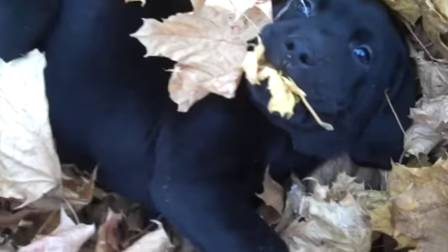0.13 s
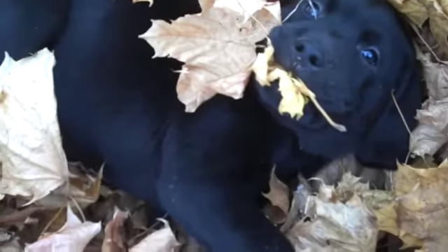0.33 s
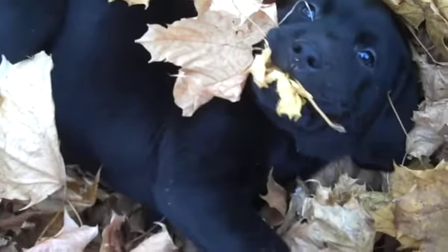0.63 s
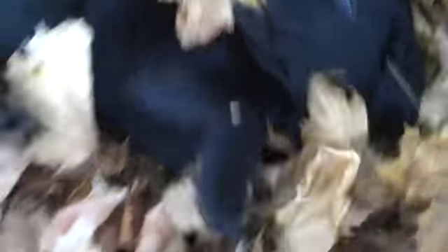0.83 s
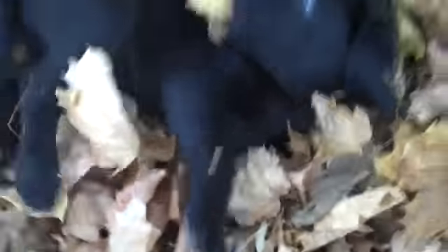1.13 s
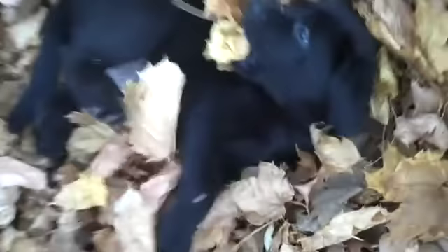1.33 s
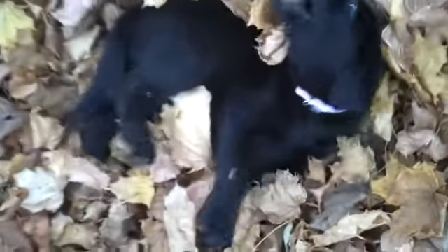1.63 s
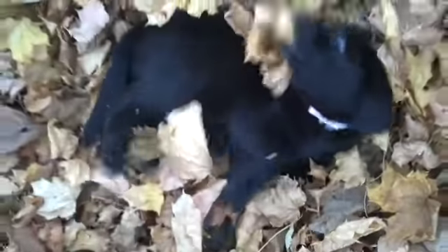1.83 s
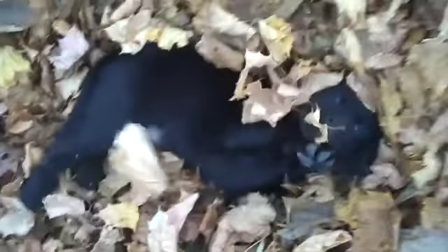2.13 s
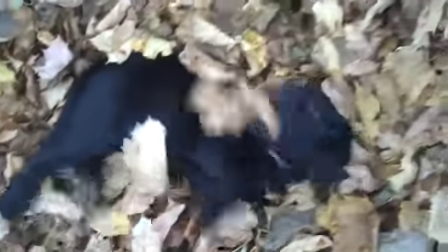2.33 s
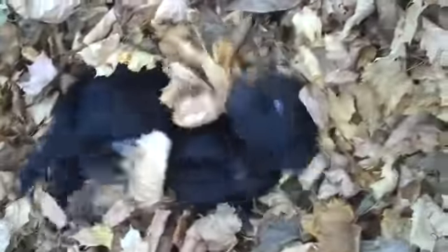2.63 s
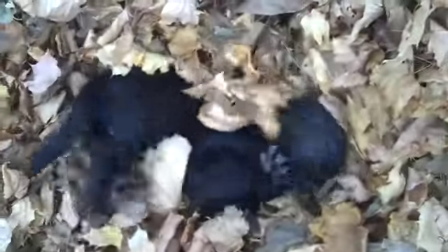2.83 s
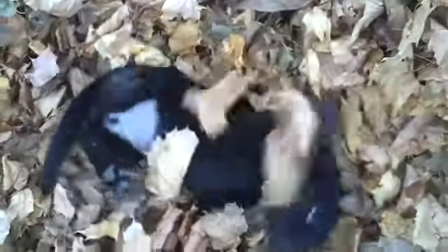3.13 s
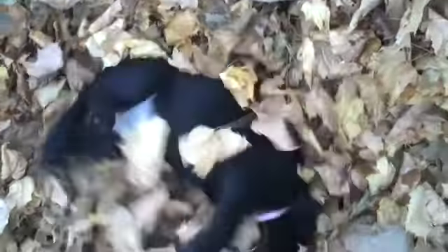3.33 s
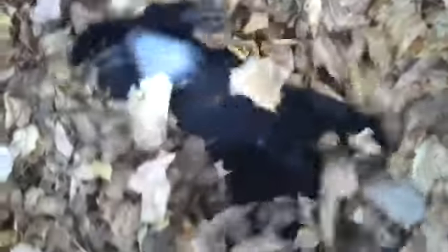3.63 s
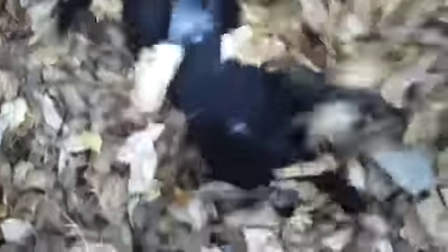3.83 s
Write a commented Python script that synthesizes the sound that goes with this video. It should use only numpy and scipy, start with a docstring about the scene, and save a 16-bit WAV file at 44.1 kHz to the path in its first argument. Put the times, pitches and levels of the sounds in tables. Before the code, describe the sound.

Dry leaves, close and crisp outdoors. After a brief silence, a soft low bump and sparse little clicks until 0.6 s, as a puppy chews a leaf. At 0.67 s a sudden crackling burst, then continuous rustling in waves, with sharp stem snaps around 0.9, 1.0 and 3.1 s. It dips near 2.2 s, peaks with heavier crunching at 3.25 s and stays busy to the end. Faint air and fading hum lie behind.

```python
"""Dry leaves rustle in a pile, close to a hand-held microphone, as a puppy chews one, squirms and rolls over.
Thousands of tiny random fractures ring briefly and merge into a rustle that swells with each movement;
the puppy's weight adds a duller crunch and a rattle of whole leaves. Stems and leaf ribs snap as short
runs of clicks. The microphone preamp's level jumps now and then and sinks back, a low electrical bump.
Behind them lie faint outdoor air and a fading low hum, both made of filtered noise."""
import sys
import numpy as np
from scipy import signal
from scipy.fft import rfft, irfft
from scipy.io import wavfile

SR = 44100
rng = np.random.default_rng(int(sys.argv[2]) if len(sys.argv) > 2 else 0)


def wav_record(signal):
    """Record a signal, one row per channel, as 16-bit PCM in the file named by sys.argv[1]."""
    frames = np.transpose(np.atleast_2d(signal))
    bounded = np.clip(frames, -1, 1)
    # unit amplitude maps onto the largest positive 16-bit level
    quanta = np.round(bounded * 32767).astype(np.int16)
    wavfile.write(sys.argv[1], SR, quanta)


N = 176400  # samples, 4 s


def amp(db):
    """Decibels to gain."""
    return 10 ** (np.asarray(db) / 20)


def unit(x):
    """Scales to rms 1."""
    return x / np.sqrt(np.mean(x ** 2) + 1e-20)


def add(mix, s, sound):
    """Mixes a sound in at a time in seconds, cut off at the end of the mix."""
    part = mix[max(round(s * SR), 0):][:len(sound)]
    part += sound[:len(part)]


def colour(x, spectrum):
    """Filters by gains given as points, joined along log frequency."""
    hz, db = np.transpose(spectrum)
    f = np.fft.rfftfreq(len(x), 1 / SR)
    gain = amp(np.interp(np.log(f + 1), np.log(hz), db))
    return irfft(rfft(x) * gain, len(x))


def wander(step_s):
    """A random curve with a new target every step and straight lines between."""
    knots = rng.standard_normal(4096)
    return np.interp(np.arange(N) / SR / step_s, np.arange(len(knots)), knots)


def ring(hz, cycles):
    """A piece of dry leaf rings as a sine that decays by 1/e in the given number of cycles."""
    turns = hz * np.arange(512) / SR
    return np.sin(2 * np.pi * turns) * np.exp(-turns / cycles)


LEAF_S, LEAF_DB = 0.04, 2.5  # each leaf is pressed and let go: step in s, swing in dB


def fractures(per_s, spread_db, cycles, low_hz, high_hz, count=32):
    """Random tiny breaks of uneven size in many leaves, each leaf with its own pitch."""
    out = np.zeros(N)
    chance = per_s / SR / count  # per sample and leaf
    for hz in np.linspace(low_hz, high_hz, count):
        draw, size = rng.random((2, N))
        at = np.flatnonzero(draw < chance)
        sign = np.where(at % 2, 1, -1)
        excess = np.minimum(-np.log(1 - size[at]), 3)  # mostly small breaks, a few large
        kicks = np.zeros(N)
        kicks[at] = sign * amp(spread_db * excess)
        pressed = kicks * amp(LEAF_DB * wander(LEAF_S))
        out += signal.oaconvolve(pressed, unit(ring(hz, cycles)))[:N]
    return unit(out / np.sqrt(chance))  # evens out the loudness as the rate changes


FULL_DB = -36.5  # movement level at which the rates below hold
RUSTLE_PER_S, CRACKLE_PER_S, CRUNCH_PER_S, RATTLE_PER_S = 12000, 260, 3000, 1500
RUSTLE_CYCLES, CRACKLE_CYCLES, CRUNCH_CYCLES, RATTLE_CYCLES = 2.6, 1.4, 0.87, 18
RUSTLE_DB, CRACKLE_DB, CRUNCH_DB, RATTLE_DB = -1.1, -13.5, -2.5, 3  # trims
RATE_GROWTH = 0.5  # rate of fractures goes with movement amplitude to this power
CRACKLE_FOLLOW = 0.88  # share of the movement's dB swing that the crackle follows
RATTLE_GROWTH = 0.21  # whole leaves rattle somewhat more when pushed harder: extra dB per dB of effort
CLUMP_S, CLUMP_DB = 0.007, 0.5  # fractures come in clumps: step in s, swing in dB at full rate

# How hard the puppy moves in the leaves: t/s, level/dB (before the trims)
MOVEMENT = [(0.07, -55.5), (0.125, -65), (0.17, -58), (0.24, -57), (0.335, -65), (0.39, -62), (0.46, -65),
            (0.54, -61), (0.62, -54.5), (0.645, -39.5), (0.67, -31.5), (0.70, -35.5), (0.735, -32),
            (0.79, -37), (0.84, -39), (0.88, -38), (0.96, -44.5), (1.04, -46.5), (1.08, -43), (1.19, -44),
            (1.26, -35.5), (1.34, -43.5), (1.40, -46.5), (1.47, -43.5), (1.51, -37.5), (1.57, -37.5),
            (1.63, -39.5), (1.84, -41), (1.92, -39.5), (2.04, -38), (2.16, -43.5), (2.21, -50),
            (2.27, -42.5), (2.34, -38.5), (2.48, -39.5), (2.6, -42), (2.85, -40.5), (3.06, -38.5),
            (3.15, -36.5), (3.21, -31), (3.245, -30), (3.275, -32), (3.305, -37.5), (3.34, -33.5),
            (3.38, -39.5), (3.44, -39.5), (3.53, -34), (3.71, -37.5), (3.85, -33.5), (3.98, -39.5)]
# How heavily it presses on the pile: t/s, level/dB (relative to the movement, before the trims)
WEIGHT = [(0.1, -7), (0.55, -2.5), (0.68, -14), (0.9, -12.5), (1.5, -14.5), (2.0, -14.5), (2.2, -9.5),
          (2.4, -13), (2.7, -11.5), (3.08, -14), (3.26, -6), (3.45, -8.5), (3.85, -9.5), (4.0, -9.5)]
# Colour of the fine rustle and the crackle: f/Hz, level/dB (relative)
RUSTLE_COLOUR = [(100, -37), (400, -27), (700, -11.5), (1000, -9.5), (1600, -10), (2300, -2.5), (3000, -1),
                 (4200, -1.5), (6000, -2), (7300, -4), (8000, -9), (8500, -19), (9000, -32)]
# Colour of the dull crunch under the weight: f/Hz, level/dB (relative)
CRUNCH_COLOUR = [(60, -38), (170, -22.5), (300, -11.5), (430, -3), (530, -6), (680, -11.5), (900, -1.5),
                 (1200, 4), (1800, 2), (3000, -4.5), (6000, -26.5), (9000, -53)]
# Colour of the whole leaves rattling: f/Hz, level/dB (relative)
RATTLE_COLOUR = [(300, -40.5), (900, -11), (1300, -4), (2000, -0.5), (3000, 1.5), (4200, -5.5), (6000, -20),
                 (9000, -55)]


def leaves():
    """Movement sets the rate and force of fractures; weight adds dull crunch and whole leaves rattling."""
    t = np.arange(N) / SR
    level = np.interp(t, *np.transpose(MOVEMENT))
    weight = np.interp(t, *np.transpose(WEIGHT))
    effort = level - FULL_DB
    busy = amp(effort) ** RATE_GROWTH

    rustle = fractures(RUSTLE_PER_S * busy, spread_db=0.5, cycles=RUSTLE_CYCLES, low_hz=901, high_hz=8590)
    rustle = unit(colour(rustle, RUSTLE_COLOUR))
    crackle = fractures(CRACKLE_PER_S * busy, spread_db=3, cycles=CRACKLE_CYCLES,
                        low_hz=2190, high_hz=8300, count=12)
    crackle = unit(colour(crackle, RUSTLE_COLOUR))
    crunch = fractures(CRUNCH_PER_S * busy, spread_db=2.5, cycles=CRUNCH_CYCLES,
                       low_hz=307, high_hz=3444, count=18)
    crunch = unit(colour(crunch, CRUNCH_COLOUR))
    rattle = fractures(RATTLE_PER_S * busy, spread_db=3, cycles=RATTLE_CYCLES,
                       low_hz=1205, high_hz=4261, count=21)
    rattle = unit(colour(rattle, RATTLE_COLOUR))

    rattle_gain = amp(RATTLE_DB + RATTLE_GROWTH * effort)
    pressed = amp(weight) * (amp(CRUNCH_DB) * crunch + rattle_gain * rattle)
    mix = amp(effort) * (amp(RUSTLE_DB) * rustle + pressed)
    mix += amp(CRACKLE_DB + CRACKLE_FOLLOW * effort) * crackle
    clumps_db = CLUMP_DB / busy * wander(CLUMP_S)  # clumps even out as more leaves move
    return amp(FULL_DB + clumps_db) * mix


SNAP_DB, SNAP_CYCLES = 1, 1  # trim, ring decay in cycles
TEAR_SHARE, TEAR_PER_S = 0.51, 5600  # size of the tearing clicks against the first, and their rate

# Leaf ribs and stems snapping close by: t/s, level/dB (peak before trim and colour), f/Hz, tear decay/s
SNAPS = [(0.1415, -38, 4270, 0.0028), (0.1533, -30.5, 2790, 0.0032), (0.169, -42, 2600, 0.0037),
         (0.18, -35.5, 3550, .005), (0.2772, -40, 2498, 0.0034), (0.3455, -33.5, 3900, 0.0023),
         (0.3489, -29, 4260, 0.0039), (0.361, -36.5, 4200, 0.0017), (0.371, -38, 4300, 0.0017),
         (0.3765, -33.5, 3200, 0.0018), (0.490, -59, 3580, .003), (0.507, -33.5, 3700, .004),
         (0.592, -40, 2600, 0.0034), (0.648, -30, 3400, 0.0046), (0.667, -21, 3050, 0.0033),
         (0.87, -20, 3900, 0.0018), (0.8717, -17.5, 4430, 0.00076), (0.9265, -22.5, 5830, 0.0012),
         (1.0165, -23, 4430, 0.00055), (1.077, -32, 5530, .001), (1.203, -34, 1600, 0.0044),
         (1.437, -32.5, 1960, 0.0065), (1.564, -27, 4400, 0.002), (2.3355, -36, 3000, 0.00092),
         (2.990, -31, 3500, .0005), (3.0944, -18, 3530, 0.0025)]
# Colour of the snaps: f/Hz, level/dB (relative)
SNAP_COLOUR = [(100, -16), (500, -11.5), (1000, -7), (2000, -2.5), (4000, -2.5), (7000, 4.5), (8000, -0.5),
               (8500, -7.5), (9000, -27)]


def snaps():
    """A rib breaks with one sharp click and tears on in a quick run of random, mostly smaller ones."""
    out, t = np.zeros(N), np.arange(2048) / SR
    for s, db, hz, tear_s in SNAPS:
        sizes = TEAR_SHARE * rng.standard_normal(len(t))
        happens = rng.random(len(t)) < TEAR_PER_S / SR
        kicks = sizes * happens * np.exp(-t / tear_s)
        kicks[0] = 1  # the break itself
        snap = np.convolve(kicks, ring(hz, SNAP_CYCLES))
        add(out, s, amp(db + SNAP_DB) * snap / abs(snap).max())
    return colour(out, SNAP_COLOUR)


SCATTER_S, SCATTER_DB = 0.005, -12  # decay and level of the scatter in the pile


def pile(x):
    """The surrounding leaves scatter each click for a few milliseconds, as a decaying noise tail."""
    t = np.arange(4096) / SR
    tail = rng.standard_normal(len(t)) * np.exp(-t / SCATTER_S)
    tail /= np.linalg.norm(tail)
    return x + amp(SCATTER_DB) * signal.oaconvolve(x, tail)[:N]


SHUDDER_FALL = 1.3  # how much faster the shudder of a bump dies than its level shift

# Low electrical bumps of the microphone preamp: t/s, level/dB (of the shift), rise/s, decay/s, shudder/share
BUMPS = [(0.0714, -35, 0.00024, 0.11, 0.09), (0.667, -36.5, 0.0069, 0.2, 0.09),
         (0.868, -47, 0.0092, 0.072, 0.1), (1.224, -51, 0.0023, 0.061, .08),
         (2.955, -49, 0.0022, .005, 0.16), (3.095, -48, .0003, .0015, .05),
         (3.191, -37, 0.056, 0.089, 0.07), (3.807, -57, 0.0045, 0.066, 0.1)]
# Colour of the shudder: f/Hz, level/dB (relative)
SHUDDER_COLOUR = [(10, -0.5), (30, 3), (70, -0.5), (110, -19), (200, -20.5), (600, -62)]


def preamp_bumps():
    """The preamp's level jumps and sinks back exponentially: a low bump with a faint noisy shudder."""
    out, t = np.zeros(N), np.arange(SR) / SR
    for s, db, rise_s, decay_s, shudder in BUMPS:
        shift = np.minimum(t / rise_s, 1) * np.exp(-np.maximum(t - rise_s, 0) / decay_s)
        tremble = unit(colour(rng.standard_normal(len(t)), SHUDDER_COLOUR))
        shake = shudder * shift ** SHUDDER_FALL * tremble
        add(out, s, -amp(db) * (shift + shake))
    return out


AIR_DB = -67  # rms
# Colour of the outdoor air around the pile: f/Hz, level/dB (relative)
AIR_COLOUR = [(20, 3.5), (60, -6), (150, -4.5), (400, -2.5), (1000, 3), (3000, -12.5), (7000, -24),
              (9000, -41.5)]


def air():
    """Faint steady outdoor background of filtered noise."""
    return amp(AIR_DB) * unit(colour(rng.standard_normal(N), AIR_COLOUR))


HUM_DB, HUM_FADE_DB_PER_S = -73.5, 7  # level at t = 0, and its fall
# Colour of the low hum in the background: f/Hz, level/dB (relative)
HUM_COLOUR = [(95, -28), (116, -4.5), (128, 4.5), (160, -26), (400, -55)]


def hum():
    """A low hum of narrow-band noise that fades steadily away."""
    fade = amp(HUM_DB - HUM_FADE_DB_PER_S * np.arange(N) / SR)
    return fade * unit(colour(rng.standard_normal(N), HUM_COLOUR))


def scene():
    """Leaves, snaps scattered by the pile, preamp bumps, air and hum at one microphone."""
    return (leaves() + pile(snaps()) + preamp_bumps() + air() + hum())[None]


START_S, EDGE_HZ = 0.0712, 9000  # silence before the sound, top of the band


def record(dry):
    """The sound starts after a moment of silence and is steeply low-passed."""
    live = dry * (np.arange(N) / SR >= START_S)
    lowpass = signal.firwin(301, EDGE_HZ, window=("kaiser", 9), fs=SR)
    return signal.oaconvolve(live, lowpass[None], "same")


dry = scene()
out = record(dry)
wav_record(out)
```